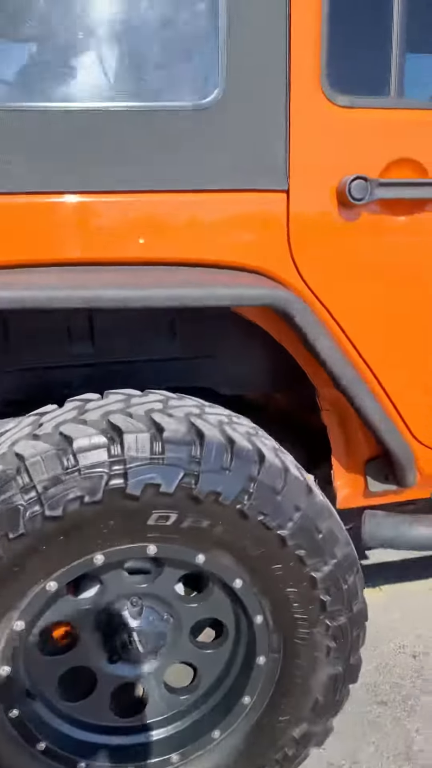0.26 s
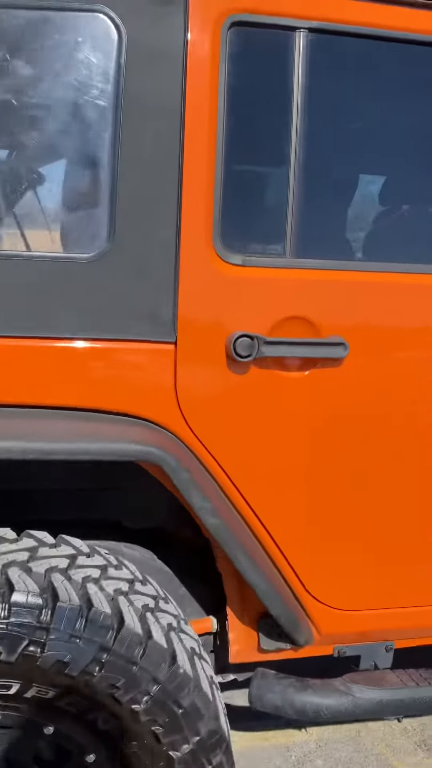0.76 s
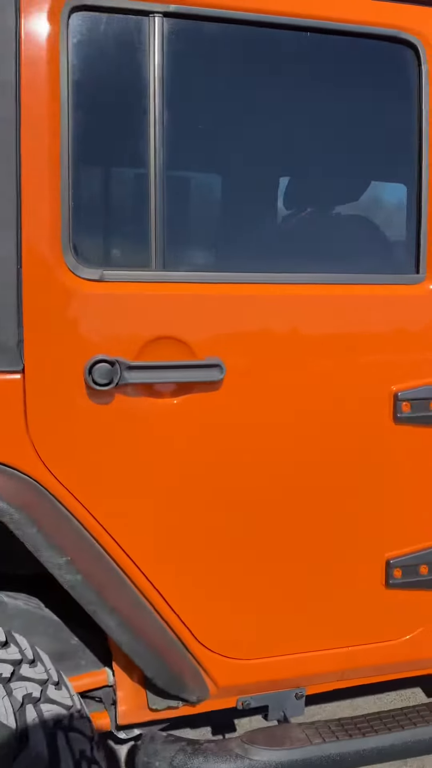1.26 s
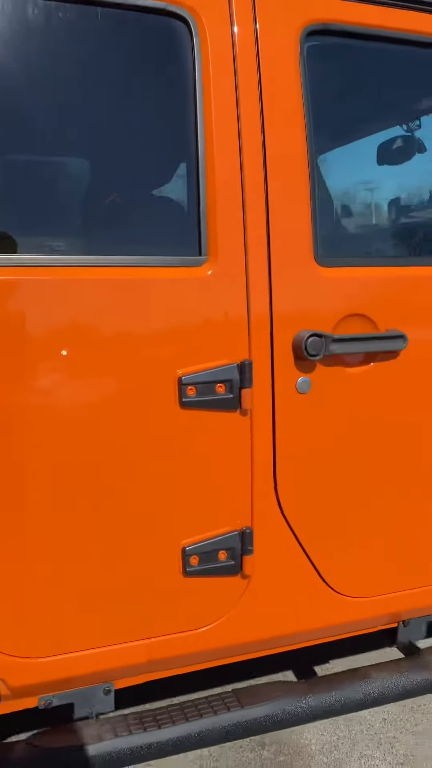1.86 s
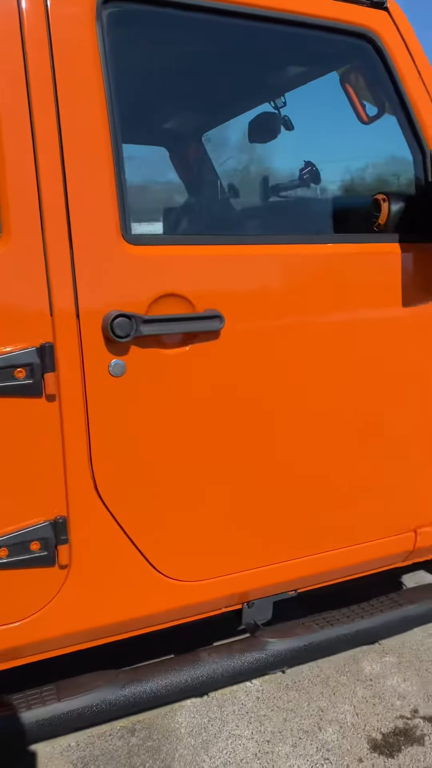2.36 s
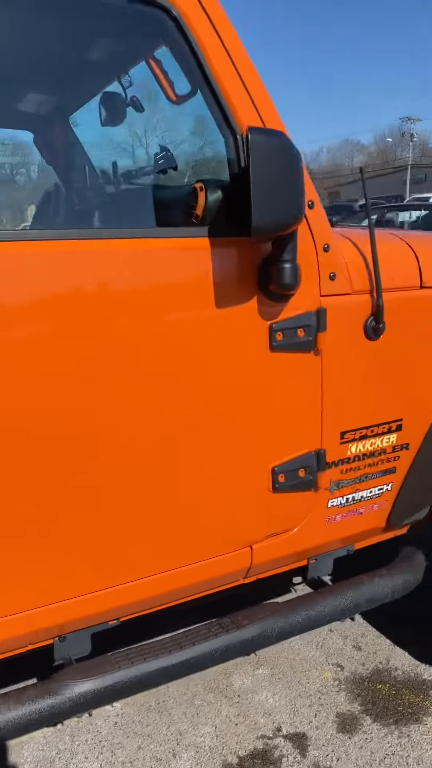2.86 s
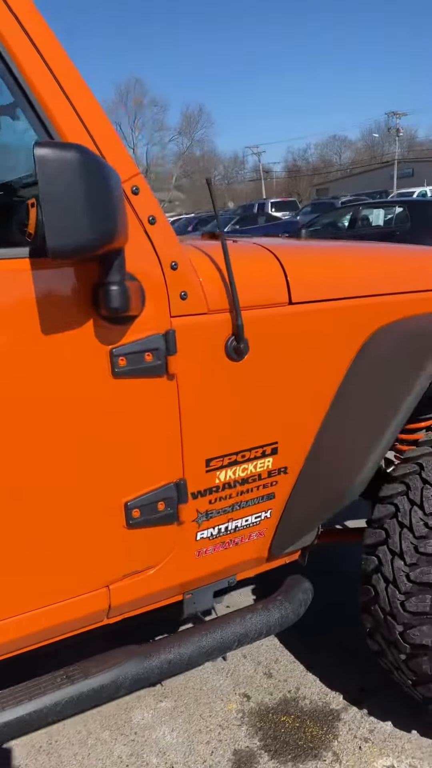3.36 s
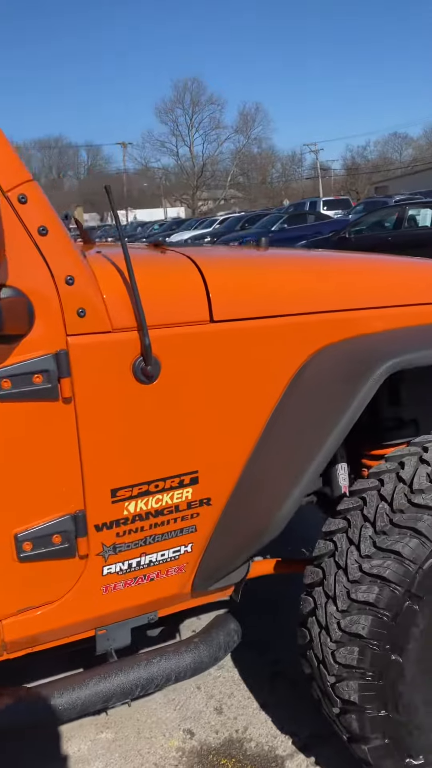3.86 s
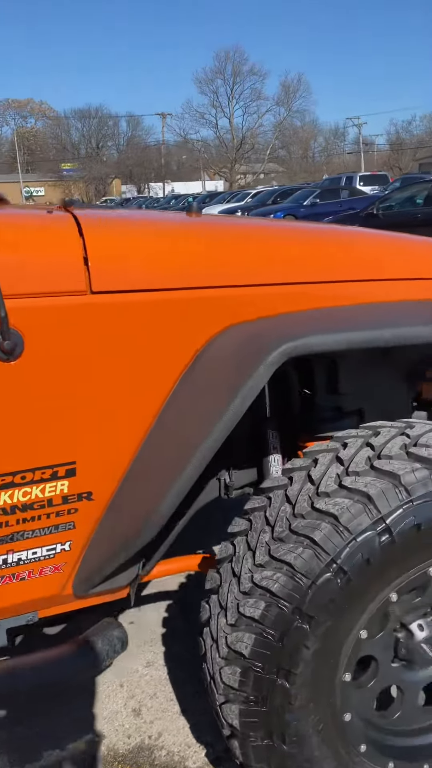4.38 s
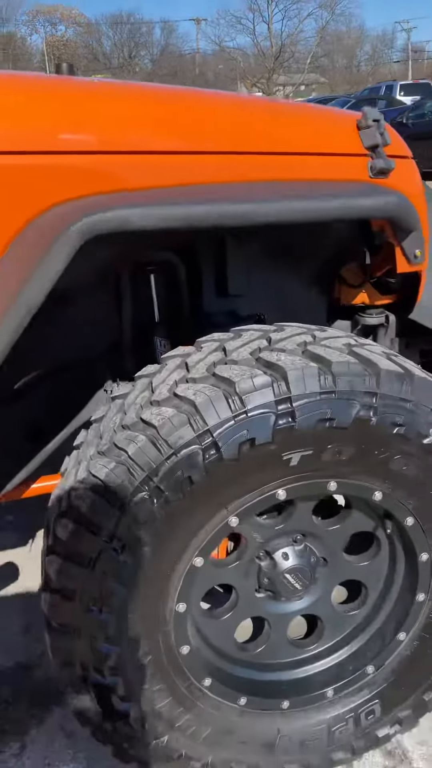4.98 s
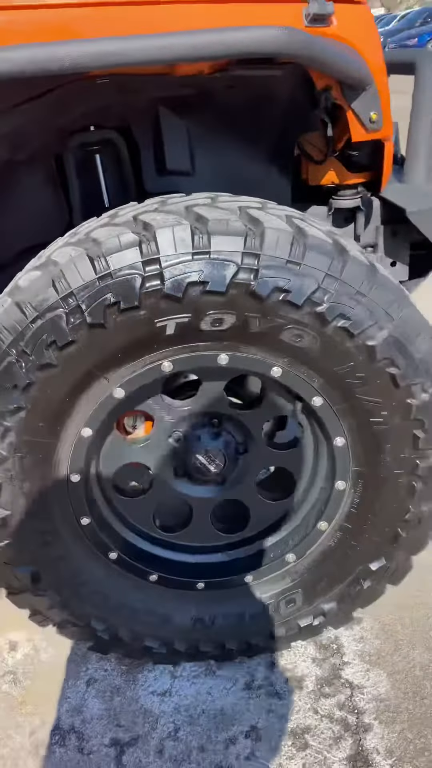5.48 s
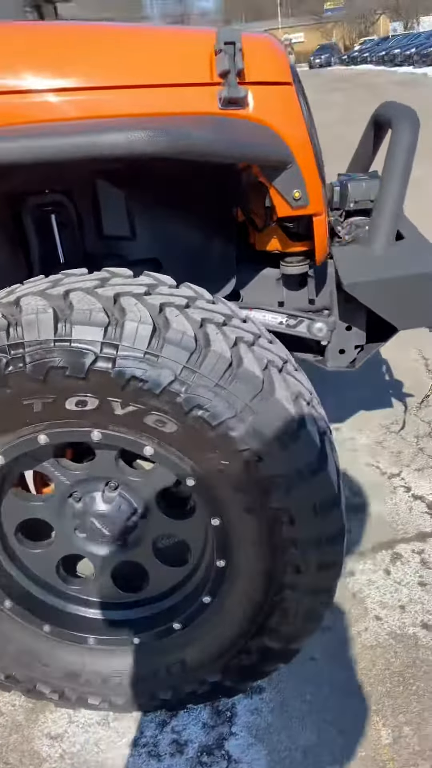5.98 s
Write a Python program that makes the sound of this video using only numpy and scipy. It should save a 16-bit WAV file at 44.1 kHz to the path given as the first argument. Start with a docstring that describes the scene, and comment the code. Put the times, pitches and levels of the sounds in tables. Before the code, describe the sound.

Walking the length of an idling off-road vehicle: deep exhaust throb gives way to brighter engine-bay clatter and hiss, with soft wind bumps.

```python
"""A six-cylinder engine idles in an open lot while the microphone is carried along the car from tail to nose.
The exhaust hums as a sum of firing orders; pipe rush, engine bay and hiss are shaped noise pulsing with the
firings, with tapped block modes, reflected noise bands (some sliding) and faint near-pure accessory tones.
Gusts buffet the two microphone ports as low noise, alike or opposite. A few footsteps on gritty asphalt are
damped swings for the heel and short noise bursts for the grit."""
import sys
import numpy as np
from scipy import signal
from scipy.fft import rfft, irfft, next_fast_len
from scipy.io import wavfile

SR = 44100
rng = np.random.default_rng(int(sys.argv[2]) if len(sys.argv) > 2 else 0)


def master(y):
    """Save y as 16-bit WAV."""
    cut = np.clip(np.atleast_2d(y).T, -1, 1)
    pcm = np.round(cut * 32767)  # scale
    wavfile.write(sys.argv[1], SR, pcm.astype(np.int16))


N = 274919
FFT = next_fast_len(N)

# idle speed along the walk: time_s, firing_rate_hz
FIRING_RATE = [(0, 34.1), (.3, 33.9), (.57, 34.0), (.76, 35.7), (1.05, 35.4), (1.6, 34.5), (2.2, 34.15),
               (4.2, 34.1), (4.7, 33.8), (5.2, 34.2), (6.23, 33.8)]


def from_db(db):
    """Decibels to amplitude."""
    return 10 ** (np.asarray(db) / 20)


def rms_one(x):
    """Scales a signal to rms 1, all its paths together."""
    return x / np.sqrt(np.mean(x ** 2) + 1e-20)


def in_time(rows):
    """Each column of a table after its time_s, read in straight lines at every sample."""
    time_s, *columns = np.transpose(rows)
    return [np.interp(np.arange(N) / SR, time_s, column) for column in columns]


def at_hz(points):
    """A table read at every FFT bin, straight on a log frequency axis."""
    hz = np.arange(FFT // 2 + 1) * SR / FFT + 1
    table_hz, values = np.array(points)[:, 0], np.array(points)[:, 1]
    return np.interp(np.log(hz), np.log(table_hz + 1), values)


def near(s, over_s):
    """Bell from 0 to 1, highest at s: a spot being passed or a gust swelling."""
    return np.exp(-.5 * ((np.arange(N) / SR - s) / over_s) ** 2)


def noise():
    """Two unrelated white noises: the direct and the diffuse path."""
    return rng.standard_normal((2, N))


def drift(rate_hz):
    """Slow random wander with spread 1: noise through two equal poles, run at every 40th sample."""
    r = np.exp(-80 * np.pi * rate_hz / SR)
    white = rng.standard_normal(N // 40 + 2002)
    slow = signal.lfilter([1], [1, -2 * r, r * r], white)[2000:]
    return np.interp(np.arange(N) / 40, np.arange(len(slow)), rms_one(slow))


def coloured(x, spectrum):
    """Shapes noise by a spectrum closed an octave beyond both ends; rms 1."""
    low_end, high_end = (spectrum[0][0] / 2, -80), (spectrum[-1][0] * 2, -80)
    closed = [low_end] + list(spectrum) + [high_end]
    return rms_one(irfft(rfft(x, FFT) * from_db(at_hz(closed)), FFT)[..., :N])


def resonance(x, hz, width_hz):
    """A two-pole mode that rings at hz and dies away faster the wider it is."""
    r = np.exp(-np.pi * width_hz / SR)
    feed = np.array([1, 0, -1]) * (1 - r * r) / 2
    return signal.lfilter(feed, [1, -2 * r * np.cos(2 * np.pi * hz / SR), r * r], x)


def swing(s, db, hz, cycles):
    """One sine swing starting at s; its envelope starts at db and falls to 1/e over the given cycles."""
    out, start = np.zeros(N), int(s * SR)
    age = np.arange(len(out[start:start + SR // 4])) / SR
    out[start:start + len(age)] = from_db(db) * np.sin(2 * np.pi * hz * age) * np.exp(-age * hz / cycles)
    return out


def beat(turn, firing_db, bank_db):
    """Gain in dB that swells at each firing, more for one bank."""
    return firing_db * np.cos(turn) + bank_db * np.cos(turn / 2)


def engine():
    """Exhaust tone, then pipe rush, bay noise, hiss and reflected bands that pulse with the firings."""
    # pipe rush: frequency_hz, level_db (relative, per Hz)
    rush_spectrum = [(40, -23), (70, -4), (110, -2), (140, -9), (190, -8), (300, -8), (500, -13),
                     (900, -23)]
    # engine bay noise: frequency_hz, level_db (relative, per Hz)
    bay_spectrum = [(200, -12), (450, 3), (900, 1.5), (1350, 0), (1900, -0.5), (2500, 0.5), (3300, -22),
                    (4500, -44.5)]
    # upper hiss: frequency_hz, level_db (relative, per Hz)
    hiss_spectrum = [(1800, -20), (2700, 0), (3500, -2.5), (4000, -5), (4820, -6.5), (5250, -10.5),
                     (5700, -8), (7000, -10), (9100, -12), (9600, -14.5), (11300, -13), (13000, -16.5),
                     (14300, -17), (15700, -22)]
    t = np.arange(N) / SR
    start_firings = -1.05   # place in the firing order at the start
    turn = 2 * np.pi * (start_firings + np.cumsum(in_time(FIRING_RATE)[0]) / SR)   # one circle a firing

    heights = harmonics()
    lumps_db = -20.5   # uneven burning, against the second harmonic
    exhaust = hum(turn, heights) + heights[2] * from_db(lumps_db) * lumps(turn) + tones()

    rush_db = -46.5 + 4 * np.exp(-t / 0.34)   # stronger near the tail pipe, fading over 0.34 s
    rush_gain = from_db(rush_db + beat(turn, .9, .19) + .8 * drift(11))
    rush = rush_gain * coloured(noise(), rush_spectrum)

    bay_db = -46 + 2.5 * near(5.1, 1.7)   # swells when passed at 5.1 s
    bay_gain = from_db(bay_db + beat(turn, .2, .4) + .8 * drift(7))
    bay = bay_gain * coloured(noise(), bay_spectrum)
    bay = bay + from_db(bay_db - 10) * clatter(turn)

    hiss_db = -50.5 + 5 * (1 - np.exp(-t / 2.67))   # gains as the nose nears
    grain = from_db(.53 * rng.exponential(1, N))   # a random lift on every sample
    hiss_gain = from_db(hiss_db + beat(turn, .7, .45) + .8 * drift(7))
    hiss = hiss_gain * coloured(noise() * grain, hiss_spectrum)

    direct_only = np.array([[1], [0]])
    return exhaust * direct_only + rush + bay + hiss + reflected_bands(beat(turn, .46, .89))


def harmonics():
    """Height of each leading harmonic along the walk; upper ones come forward at spots beside the car."""
    # exhaust heard on the walk, ahead of the order gains: time_s, second_harmonic_db, third_harmonic_db
    exhaust_levels = [(0.0, -33, -30.5), (0.3, -33, -33), (0.57, -36.5, -36), (0.76, -29.5, -30.5),
                      (1.05, -30, -32), (1.25, -34, -35), (1.55, -36.5, -39.5), (2.4, -36.5, -39.5),
                      (3.0, -36, -38.5), (3.3, -38, -41), (3.6, -36.5, -39.5), (4.1, -36, -40.5),
                      (4.4, -39, -43.5), (5.1, -36, -43), (5.7, -37, -42), (6.23, -37.5, -41)]
    # spots where a harmonic comes forward: added_level_db, nearest_s, heard_over_s
    spots = [(-44, 0.2, 0.3), (-53, 4.0, 0.5), (-45, 5.7, 0.7), (-46, 0.25, 0.28), (-49, 4.1, 0.35),
             (-58, 2.2, 1.2), (-58, 5.8, 0.4)]
    # which harmonic comes forward at each spot: harmonic
    spot_harmonics = [4, 4, 4, 6, 6, 6, 6]
    floor_db = -70   # upper harmonics away from the spots
    second_db, third_db = in_time(exhaust_levels)
    heights = {2: from_db(second_db), 3: from_db(third_db)}
    for harmonic, (db, s, over_s) in zip(spot_harmonics, spots):
        so_far = heights.get(harmonic, from_db(floor_db))
        heights[harmonic] = so_far + from_db(db) * near(s, over_s)
    return heights


def hum(turn, heights):
    """Uneven banks add half orders; each order arrives later as its path grows, and wavers a little."""
    # orders in the hum: multiple of the firing rate
    multiples = [1, 1.5, 2, 2.5, 3, 3.5, 4, 4.5, 5, 5.5, 6, 6.5, 7, 7.5]
    # harmonic whose height each order follows: harmonic
    leaders = [2, 2, 2, 2, 3, 3, 4, 2, 2, 2, 6, 6, 2, 6]
    # each order over its leader: gain_db, pipe_lag_rad, path_share (of the walked path in its delay)
    order_gains = [(-18, -.1, .62), (-24, .1, 1), (.8, .8, 1), (-11.5, 1.2, 1), (.8, 1.3, 1.17),
                   (-6.5, .2, 1.07), (0, 3.4, .9), (-19, 2, .46), (-20.5, 1.5, .46), (-17.5, 2.1, .45),
                   (0, .4, .6), (-8, 1, .6), (-21, 4.5, .6), (-13, 2, .6)]
    # path from the tail pipe along the walk: time_s, added_path_m
    added_path = [(0, 0), (1.6, 0), (2.0, .9), (2.6, 2.1), (3.0, 1.9), (3.75, 3.5), (4.0, 3.1), (4.6, 3.2),
                  (5.1, 4.2), (5.7, 4.65), (6.23, 4.65)]
    late = 2 * np.pi * in_time(FIRING_RATE)[0] * in_time(added_path)[0] / 343   # rad, at 343 m/s
    out = 0
    for multiple, leader, (db, lag, share) in zip(multiples, leaders, order_gains):
        waver_db, slip = .6 * drift(5), .08 * drift(4)
        phase = multiple * (turn - share * late) - lag + slip
        out = out + heights[leader] * from_db(db + waver_db) * np.sqrt(2) * np.cos(phase)
    burn_db = 1.1 * drift(7)   # runs of firings burn stronger or weaker, in all orders at once
    return out * from_db(burn_db)


def lumps(turn):
    """No two firings burn alike: the surplus or lack of each one rings the pipe."""
    # exhaust pipe modes: frequency_hz, width_hz, level_db (relative)
    pipe_modes = [(88, 13, -11.5), (128, 45, -9)]
    fired = np.diff(np.floor(turn / (2 * np.pi)), prepend=0) * rng.standard_normal(N)
    rung = 0
    for hz, width_hz, db in pipe_modes:
        rung = rung + from_db(db) * resonance(resonance(fired, hz, width_hz), hz, width_hz)
    return rms_one(rung)


def tones():
    """Pumps and belt-driven accessories: near-pure tones that waver a little in level and phase."""
    # accessory tones: pitch_hz, level_db (about which it wavers), nearest_s, heard_over_s
    accessories = [(162, -54, 2.4, 1.0), (376, -54.5, .65, .75), (377, -57, 3.8, .4), (377, -60, 5.0, .4),
                   (1180, -61, .8, 1.5), (1180, -61, 4.0, 1.0), (1814, -65, 3.2, 1.2),
                   (1814, -59, 5.0, .35), (2380, -60, 5.7, .6), (2376, -63, 3.8, .6), (2706, -58, 5.0, .4)]
    t, out = np.arange(N) / SR, 0
    for hz, db, s, over_s in accessories:
        level = from_db(db + 2.5 * drift(5)) * near(s, over_s)
        out = out + level * np.sqrt(2) * np.sin(2 * np.pi * hz * t + .8 * drift(3))
    return out


def clatter(turn):
    """Valves and injectors tap twice a firing, unevenly, into short block modes."""
    taps = np.diff(np.floor(turn / np.pi + .1 * drift(30)), prepend=0) != 0
    modes_hz = np.geomspace(700, 3200, 9)
    return rms_one(sum(resonance(taps * noise(), hz, 110) for hz in modes_hz))


def reflected_bands(pulsing_db):
    """Engine noise reflected off ground and body: narrow to broad bands, some sliding, loudest where passed."""
    # bands: centre_hz (at nearest), slide_hz_per_s, width_hz, level_db (about which it flickers),
    # nearest_s, heard_over_s, diffuse_over_direct_db
    bands = [(390, 0, 30, -55, 5.7, .45, -6), (1100, -20, 28, -56, 5.6, .5, -6),
             (1150, -50, 45, -56, 4.3, .6, -6), (585, 0, 40, -52, 3.85, .35, -6),
             (590, 0, 60, -58, 1.0, .6, 0), (560, 0, 25, -57, 4.8, .4, -6), (720, 0, 80, -57, 3.8, .3, 0),
             (258, 0, 10, -55, 3.9, .3, -6), (190, 0, 110, -48, 5.9, .45, -3),
             (1420, -20, 100, -56.5, 1.3, 1.2, -8), (1380, -90, 70, -55, 2.9, .5, 0),
             (1330, 0, 90, -54, 4.0, .6, 0), (1370, 120, 70, -55, 5.3, .3, 0),
             (1600, 60, 70, -58, 3.9, .5, 0), (1690, 0, 50, -60, 1.3, .3, 0),
             (1980, -30, 90, -59, 1.8, 1.6, 3), (1800, 0, 250, -66, .1, .3, 12),
             (1250, 0, 700, -64, 5.7, .7, 12), (1830, 0, 50, -59, 2.8, .4, 2),
             (1860, 120, 50, -54, 5.1, .35, 0), (1900, 0, 60, -59, 4.0, .4, 3),
             (2650, 0, 150, -63, 6, .3, 9), (2240, 30, 70, -62, .6, .9, 5),
             (2090, -60, 70, -61, 4.1, .5, 5), (2400, 0, 400, -51, 3.4, .9, -20),
             (2480, 0, 110, -59, 5.2, .3, 8), (2400, -40, 130, -59, 5.9, .35, 9),
             (2550, 0, 400, -56, 5.3, .9, 0), (2230, 0, 90, -63, 6, .4, 9), (2700, 0, 60, -64, 3.3, .6, 7),
             (2705, 0, 50, -61, 5.0, .45, 9), (2950, 20, 160, -63, 3.7, .9, 9),
             (3050, -100, 500, -61, 5.4, 1.0, 9), (4100, 0, 900, -58, 4.9, .8, 3)]
    flicker_db = 2.5   # each band comes and goes
    source, out, t = noise() + 1j * noise(), np.zeros((2, N)), np.arange(N) / SR
    for hz, slide, width_hz, db, s, over_s, diffuse_db in bands:
        heard = slice(int(max(s - 3 * over_s, 0) * SR), int((s + 3 * over_s) * SR))
        r, age = np.exp(-np.pi * width_hz / SR), t[heard] - s
        own_noise = np.roll(source, rng.integers(N), axis=1)[:, heard]
        low_band = signal.lfilter([1], [1, -2 * r, r * r], own_noise)
        carrier = np.exp(2j * np.pi * (hz + slide * age / 2) * age)
        band = rms_one((low_band * carrier).real)
        swell = (near(s, over_s) * from_db(flicker_db * drift(6)))[heard]
        out[:, heard] += from_db([[db], [db + diffuse_db]]) * swell * band
    return out * from_db(pulsing_db)


def wind():
    """Lumpy low noise and bumps press both ports alike; eddies in spurts push one and pull the other."""
    # gusts on both ports: peak_s, level_db (added to the breeze), half_length_s
    gusts = [(.08, -34, 0.18), (1.186, -37.5, 0.026), (1.44, -33, 0.18), (1.944, -53, 0.039),
             (2.163, -49, 0.13), (3.16, -34, 0.026), (3.501, -43.5, 0.17), (3.874, -38.5, 0.047),
             (4.046, -44.5, 0.072), (4.21, -41.5, 0.11), (4.537, -32, 0.068), (4.82, -40, 0.026),
             (4.885, -34, 0.062), (5.133, -38.5, 0.047)]
    # buffeting: frequency_hz, level_db (relative, per Hz)
    buffet_spectrum = [(15, -24.5), (28, -18), (45, 3), (60, 4), (85, 0), (130, -6), (250, -19),
                       (500, -41.5)]
    # single gusts that bump both ports: start_s, level_db (ahead of the decay), pitch_hz
    bump_swings = [(1.405, -23, 55), (1.614, -21, 75), (1.929, -26, 55), (3.702, -25, 85), (3.874, -26, 75),
                   (4.204, -26, 55), (4.525, -22, 65), (5.086, -25, 70)]
    # strength of the eddies: time_s, level_db
    eddies = [(0.0, -30), (.45, -33.5), (.95, -54), (1.03, -32), (1.5, -34.5), (1.68, -46.5), (1.93, -34),
              (2.3, -38), (2.68, -50), (2.87, -31), (2.98, -45), (3.06, -39), (3.5, -37), (3.75, -50.5),
              (4.2, -47), (4.45, -34.5), (5.45, -33.5), (5.95, -68), (6.23, -64)]
    # eddy flutter: frequency_hz, level_db (relative, per Hz)
    flutter_spectrum = [(21, -31.5), (43, -15), (75, -1.5), (130, -7.5), (215, -16.5), (300, -28),
                        (500, -35), (800, -41)]
    white = noise()
    breeze = from_db(-49 + 4 * drift(2.5))   # between the gusts
    force = breeze + sum(from_db(db) * near(s, half_s) for s, db, half_s in gusts)
    push = force * coloured(white[0], buffet_spectrum)
    bumps = sum(swing(s, db, hz, cycles=2.0) for s, db, hz in bump_swings)
    spurts = from_db(2 * drift(25) + 2.5 * drift(11))
    pull = from_db(in_time(eddies)[0]) * coloured(white[1] * spurts, flutter_spectrum)
    return push + bumps + pull * np.array([[1], [-1]])


def steps():
    """A heel thud is a cluster of damped swings of the sole; a scuff is a burst of grit noise."""
    # heel thud swings: start_s, level_db (ahead of the decay), pitch_hz
    thuds = [(.7185, -30, 700), (.7235, -31, 620), (.751, -34, 450), (.7595, -30, 850), (.7725, -29, 700),
             (5.3292, -32, 950), (5.331, -22, 500), (5.3335, -27, 300), (5.342, -32, 300),
             (5.9645, -31, 950), (5.967, -31, 560), (5.9695, -31, 900), (5.9695, -28, 300),
             (5.9805, -26, 330), (5.9833, -23, 360), (5.9845, -31, 600), (5.99, -27, 140),
             (6.2092, -27, 850), (6.2108, -26, 520), (6.2135, -29, 300)]
    # grit under a sole: start_s, level_db (ahead of the fade), length_s
    scuffs = [(.7165, -32, .010), (.746, -43, .018), (.771, -38, .009), (5.328, -43, .018),
              (5.963, -45, .03), (6.208, -40, .006)]
    # grit: frequency_hz, level_db (relative, per Hz)
    grit_spectrum = [(300, -8), (700, 1), (1300, -5), (2000, 4), (2500, -3), (3000, 1), (3500, -7),
                     (4100, -2), (5500, -17), (9000, -25)]
    out, t = np.zeros((2, N)), np.arange(N) / SR
    out[0] = sum(swing(s, db, hz, cycles=1.57) for s, db, hz in thuds)   # direct path only
    grit = coloured(noise(), grit_spectrum)
    for s, db, length_s in scuffs:
        rise = np.clip((t - s) / .001, 0, 1)   # over 1 ms
        fade = np.exp(-np.clip((t - s) / length_s, 0, 4) ** 2)
        out += from_db(db) * grit * rise * fade
    return out


def ports(paths):
    """The direct path reaches both ports with a phase lead; the diffuse path is opposite at the two."""
    # phase between the ports: frequency_hz, left_lead_rad
    left_lead = [(40, 0), (300, .08), (520, .4), (950, .8), (1380, .45), (1800, .9), (2240, 2.6),
                 (3100, 2.9), (3550, 3.3), (4350, 1.35), (4820, 3.05), (5600, 1.6), (7400, 2.5),
                 (8400, np.pi), (12200, np.pi), (13450, 3.7), (14700, 5.4), (15600, 6.25)]
    # level between the ports: frequency_hz, left_over_right_db
    left_over_right = [(300, 0), (550, -1), (950, 4.5), (1400, 3.5), (2300, -.7), (4000, -3), (4900, 0)]
    # likeness of the ports: frequency_hz, share (0-1)
    likeness = [(60, .995), (300, .93), (550, .7), (1400, .82), (1800, .6), (2300, .66), (3500, .68),
                (4000, .15), (4800, .6), (5800, .76), (7500, .72), (8400, 1), (12150, 1), (12500, .8),
                (14500, .5), (15600, .96)]
    direct, diffuse = rfft(paths, FFT)
    alike = at_hz(likeness)
    common = np.sqrt((1 + alike) / 2) * direct
    apart = np.sqrt((1 - alike) / 2) * diffuse
    # half of the level and phase difference goes to each port
    tilt = from_db(at_hz(left_over_right) / 2) * np.exp(.5j * at_hz(left_lead))
    return irfft([(common + apart) * tilt, (common - apart) / tilt], FFT)[:, :N]


def scene():
    """Engine and steps reach the two ports through the air; the wind presses on the ports themselves."""
    return ports(engine() + steps()) + wind()


def record(dry):
    """The microphone drops the deepest bass; the top is cut steeply."""
    bass_cut_hz, top_cut_hz = 31, 15750
    bass_cut = signal.butter(2, bass_cut_hz, "high", fs=SR, output="sos")
    top_cut = signal.ellip(12, .5, 80, top_cut_hz, fs=SR, output="sos")
    return signal.sosfilt(top_cut, signal.sosfilt(bass_cut, dry))


dry = scene()
out = record(dry)
master(out)
```